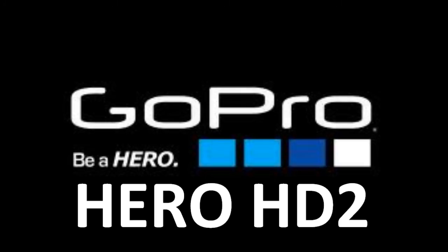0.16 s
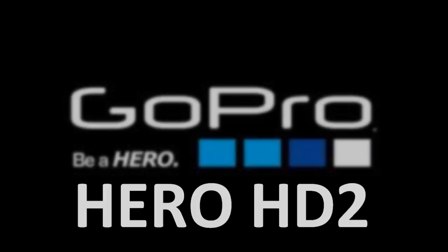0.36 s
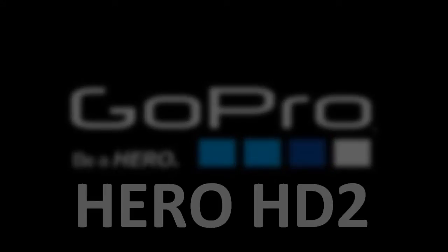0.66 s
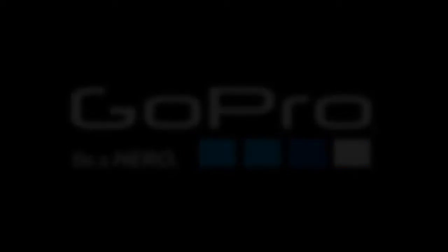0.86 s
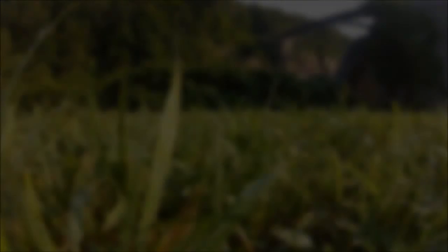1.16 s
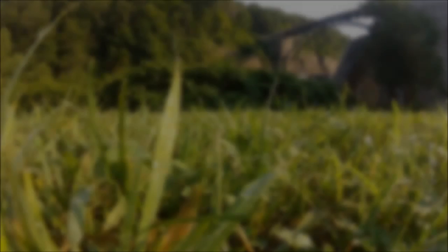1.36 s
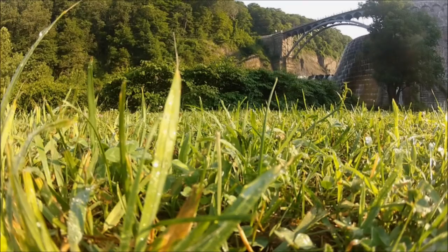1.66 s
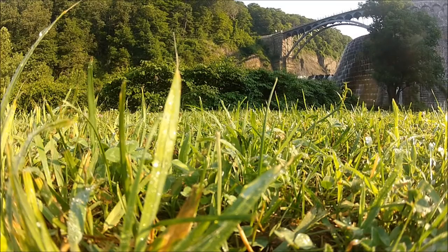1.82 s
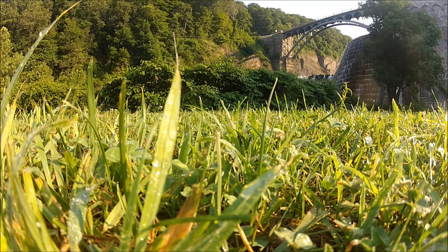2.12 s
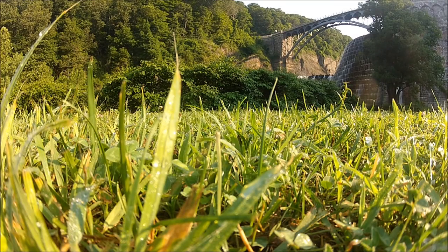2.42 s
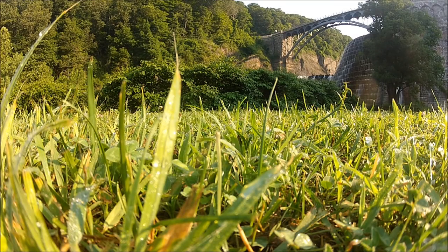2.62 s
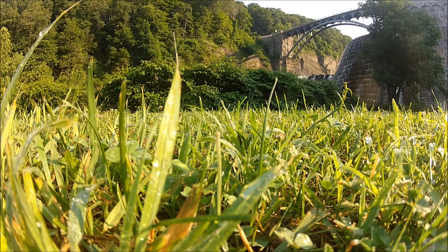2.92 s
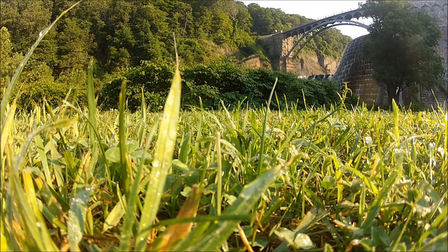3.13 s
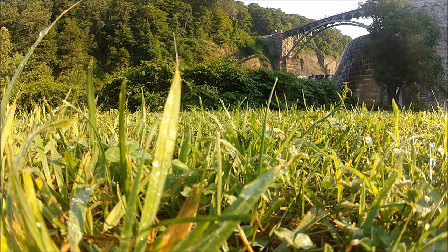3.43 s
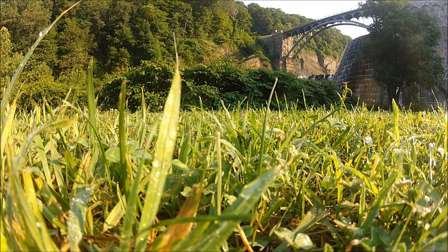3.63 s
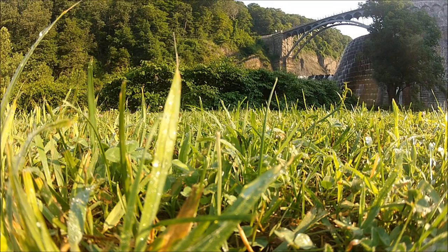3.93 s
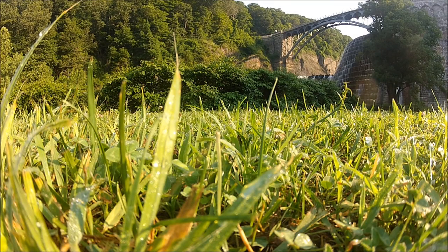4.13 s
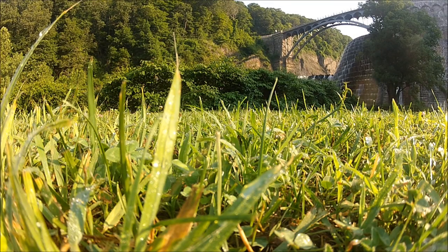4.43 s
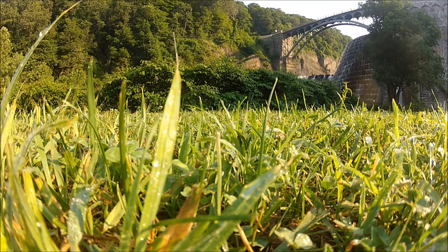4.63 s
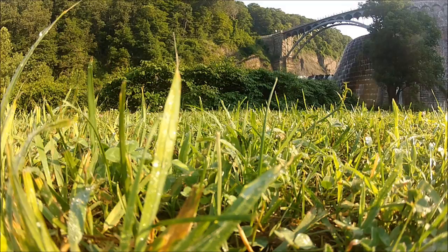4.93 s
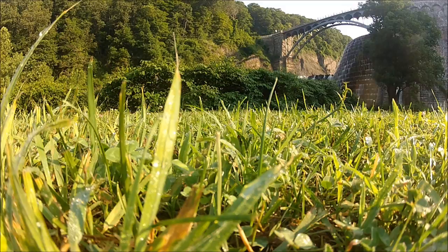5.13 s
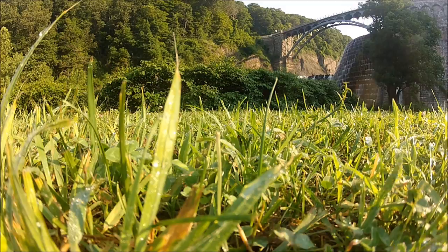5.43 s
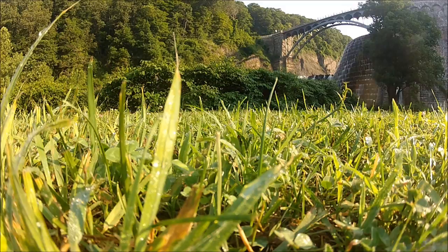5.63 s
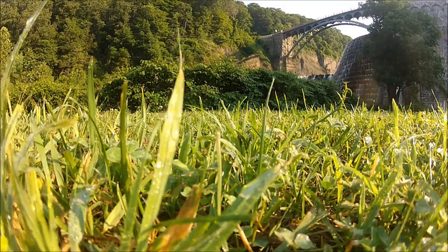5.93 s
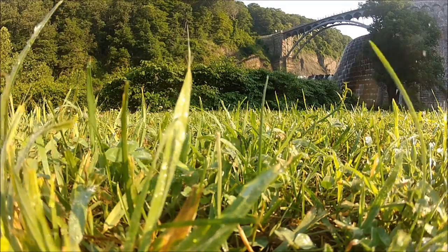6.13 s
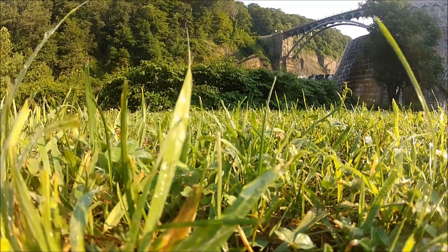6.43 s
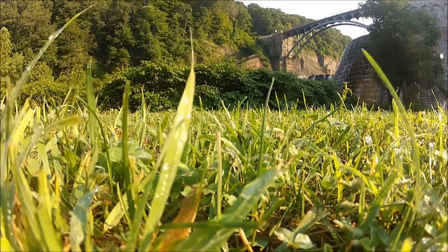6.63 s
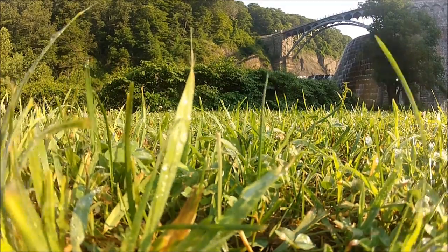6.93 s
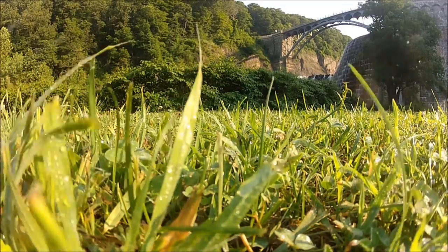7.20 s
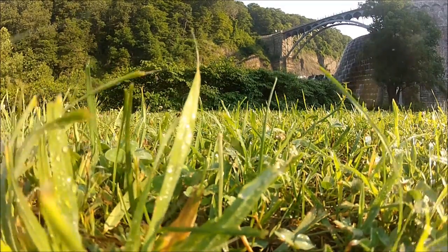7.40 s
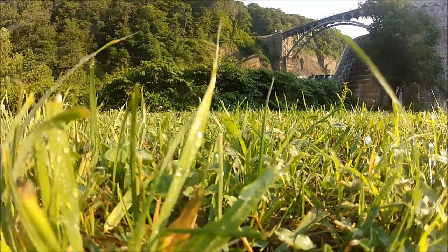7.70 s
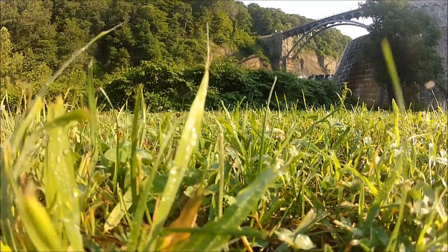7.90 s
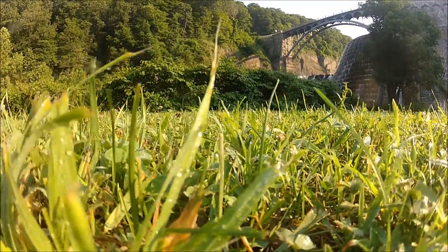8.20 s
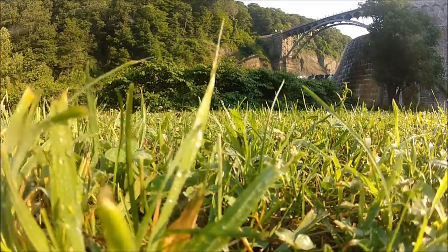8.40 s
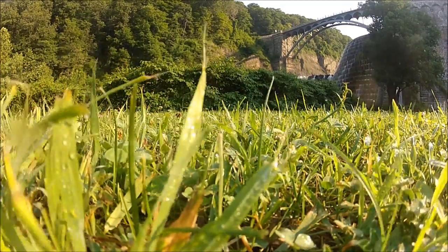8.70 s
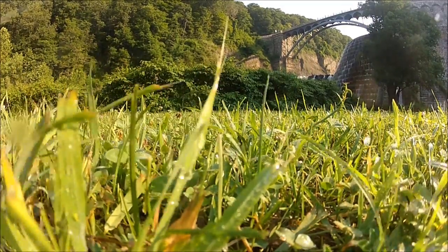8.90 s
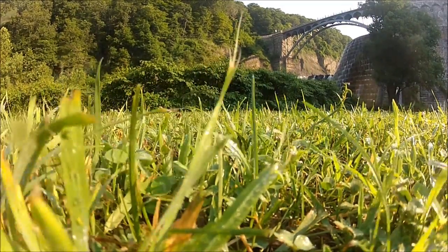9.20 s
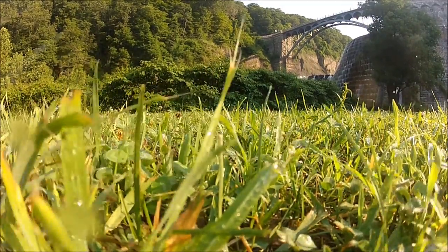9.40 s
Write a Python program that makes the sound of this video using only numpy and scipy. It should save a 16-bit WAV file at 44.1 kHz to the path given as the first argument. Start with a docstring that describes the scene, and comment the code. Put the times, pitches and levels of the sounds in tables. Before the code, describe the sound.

Outdoors, near silence gives way to a soft, low, distant rush that grows for over five seconds. A small quadcopter then gives a short high chirp and a gritty stuttering buzz; its motors whine steeply upward with a resonant growl. It lifts off into a low blade hum with rushing air. The microphone rides on the drone's frame, so everything is close, dry and slightly harsh in the treble.

```python
"""Quadcopter take-off from grass

A small quadcopter is heard from a camera on its own frame over a steady outdoor rush, as the sound fades in
from silence. The speed controllers chirp, the motors stutter into motion and spin up through the frame's
resonances, and it lifts off: blade hum, motor whine and prop wash. One shaft angle drives the tones. The camera
samples at a low rate, mirroring the treble."""
import sys
import numpy as np
from scipy import signal
from scipy.fft import rfft, irfft, next_fast_len
from scipy.io import wavfile
from scipy.ndimage import map_coordinates

SR = 44100
rng = np.random.default_rng(int(sys.argv[2]) if len(sys.argv) > 2 else 0)


def inscribe(sig):
    """Save sig as 16-bit PCM at rate SR to the path in sys.argv[1].

    A 1-D sig is mono; a 2-D sig holds one channel per row.
    Samples are clipped to [-1, 1] before scaling.
    """
    pcm = np.round(np.clip(np.atleast_2d(sig).T, -1, 1) * 32767)
    wavfile.write(sys.argv[1], SR, pcm.astype(np.int16))


N = 421155
T = np.arange(N) / SR  # s

# rotor run-up: (time [s], blade passes [Hz])
BLADE_PASS_CURVE = [(5.7, 51.34), (5.8, 70.43), (5.9, 92.92), (6.0, 105), (6.09, 115.1), (6.2, 121.7),
                    (6.35, 128.7), (6.62, 131.9), (6.71, 138.6), (6.88, 158.5), (7.01, 166.1),
                    (7.42, 172.1), (8.2, 177.6), (8.35, 178), (8.8, 185.5), (9.06, 186.2), (9.22, 188.7),
                    (9.55, 188.5)]
# two-blade rotor tones, relative to the hum: (multiple of shaft rate [-], level [dB])
BLADE_ORDERS = [(1, -21), (2, 1), (3, -19), (4, -5), (5, -26), (6, -15), (7, -23), (8, -19.5), (9, -40),
                (10, -21.5), (11, -35), (12, -24), (13, -52), (15, -43), (16, -21.5), (17, -27)]
# motor tones before the mounts: (multiple of shaft rate, rounded in use [-], level [dB], phase jitter [turns])
MOTOR_ORDERS = [(14, -25.5, .06), (42, -27.5, 0.021), (84.3, -24, .04)]
# motor mount resonances: (centre [Hz], half width [Hz], gain [dB])
MOUNT_RESONANCES = [(777, 116, 0.5), (1336, 28.9, -6.5), (1870, 230, -7), (3850, 142, -4.5), (5230, 600, 0)]
# motors out of step: (time ahead of the main one [s], magnet note before the mounts [dB], whine likewise [dB])
STRAGGLER_MOTORS = [(0.064, -30, -30), (-.12, -28, -25.5)]
# electrical whistles before the mounts:
# (multiple of switching rate [-], multiple of shaft rate [-], ground level [dB], flight level [dB])
WHISTLE_ORDERS = [(1, -84, -28, -70), (0, 126, -26.5, -60), (1, -70, -30.5, -63), (1, -42, -30, -33.5),
                  (0, 56, -25, -50), (0, 52, -30, -48), (1, -52, -39, -36), (-1, 168, -30, -33),
                  (0, 63, -38, -35), (2, -126, -38, -39), (-1, 147, -36, -38)]
# shaking by rotor imbalance and magnets, before the arms: (multiple of shaft rate [-], level [dB])
SHAKING_ORDERS = [(5, -2), (7, -8), (8, -3.5), (9, -20), (10, -7.5), (11, -6), (12, 1), (13, 1), (15, -4),
                  (16, -6), (17, -10), (18, -10)]
# arm bending modes: (centre [Hz], width [Hz], gain [dB])
ARM_MODES = [(292, 41, -3), (622, 59, 1), (750, 220, -10.5), (1400, 170, -20)]
# frame resonances: (centre [Hz], width [Hz], gain [dB])
FRAME_MODES = [(294, 47, 5.5), (658, 47, 8), (1357, 84, 4), (1950, 350, -8), (3895, 180, 2.5),
               (5520, 480, 3.5)]
# prop wash spectrum shape: (frequency [Hz], level [dB])
WASH_SPECTRUM = [(20, -22), (45, -7), (90, -1.5), (270, 1), (420, -1.5), (600, -1.5), (800, -6), (1150, -9),
                 (1700, -13), (3000, -17.5)]
# blade hiss spectrum shape: (frequency [Hz], level [dB])
HISS_SPECTRUM = [(600, -22), (1200, -3), (1420, 8), (1650, -0.5), (2000, -0.5), (2900, 4), (3300, -1),
                 (3800, 1), (4400, -6.5), (5400, -6), (6000, -4)]
# turbulence surges: (time [s], spread [s], rise [dB])
GUST_SURGES = [(7.169, 0.072, 0), (8.41, .08, 2), (9.4, .18, 1)]
# outdoor rush spectrum shape: (frequency [Hz], level [dB])
RUSH_SPECTRUM = [(15, -57), (25, -18), (106, -1.5), (416, -1), (1060, -7), (1250, -10.5), (1530, -19.5),
                 (1970, -26), (2900, -20), (3650, -24.5), (4910, -20), (5260, -23), (5900, -23.5),
                 (7670, -62), (13000, -120)]

LIFT_START_S, LIFT_END_S = 6.68, 7.12  # legs unload, then leave the grass
HUM_DB, HUM_FULL_HZ, HUM_DB_PER_OCTAVE = -17, 137.3, 19  # hum grows with blade-pass rate up to HUM_FULL_HZ
THIRD_DB = -14.5  # extra third blade harmonic near the ground, relative to the hum
SHELL_HZ, SHELL_WIDTH_HZ, SHELL_DB = 582, 23.4, 0  # body resonance, added to the direct sound
SWITCH_HZ = 8075  # power switching rate
WASH_DB, HISS_DB = -22, -26  # air noise away from the ground, before gusts
GROUND_WASH_DB, GROUND_HISS_DB = 1.5, 3.8  # extra air noise close to the ground
FADE_START_S, FADE_END_S, RUSH_DB = 0.25, 5.66, -31.5  # rush level at the end of its fade-in
CLIP_LEVEL, TOP_HZ = 0.88, 15300  # peak limit, upper band edge


def amp(db):
    """Decibels to gain."""
    return 10 ** (np.asarray(db) / 20)


def unit(x):
    """x at rms 1."""
    return x / np.sqrt(np.mean(x ** 2) + 1e-20)


def curves(rows):
    """One value per sample for each column after the time."""
    time_s, *columns = np.transpose(rows)
    return [np.interp(T, time_s, column) for column in columns]


def ramp(start_s, end_s):
    """0 before start, 1 after end, linear between."""
    return np.clip((T - start_s) / max(end_s - start_s, 1e-3), 0, 1)


def wobble(rate_hz):
    """Smooth random curve, rate_hz knots a second."""
    knots = rng.standard_normal(4096)
    return map_coordinates(knots, [T * rate_hz], order=3, mode="wrap")


def filtered(x, response):
    """x times a response of frequency."""
    size = next_fast_len(N + SR // 2)
    spectrum = rfft(x, size) * response(np.fft.rfftfreq(size, 1 / SR))
    return irfft(spectrum, size)[:N]


def coloured(x, points):
    """x through a spectrum of (frequency [Hz], level [dB]) points on a log axis."""
    point_hz, db = np.transpose(points)
    return filtered(x, lambda hz: amp(np.interp(np.log(hz + 1), np.log(point_hz), db)))


def noise(points):
    """Noise of rms 1 with the given spectrum."""
    return unit(coloured(rng.standard_normal(N), points))


def tone(turns):
    """Cosine of rms 1."""
    return np.sqrt(2) * np.cos(2 * np.pi * turns)


def ringing(x, modes):
    """x through parallel resonances (centre [Hz], width [Hz], gain [dB]) of alternating sign."""
    def response(hz):
        total = 0
        for k, (centre, width, db) in enumerate(modes):
            damping = 1j * hz * width
            total = total + (-1) ** k * amp(db) * damping / (centre ** 2 - hz ** 2 + damping)
        return total
    return filtered(x, response)


def envelope(db, full_s, release_s, rise_db_per_s, fall_db_per_s):
    """Gain that rises to a level, holds it and dies away."""
    rise_db = rise_db_per_s * np.maximum(full_s - T, 0)
    fall_db = fall_db_per_s * np.maximum(T - release_s, 0)
    return amp(db - rise_db - fall_db)


def airborne():
    """0 on the ground, 1 in flight."""
    return ramp(LIFT_START_S, LIFT_END_S)


def stutter():
    """The motors catch in surges, twenty a second, as they start."""
    depth = 0.6 * ramp(5.55, 5.68) * (1 - ramp(5.95, 6.2))
    return 1 + depth * tone(20 * T - 0.4)


def sing(turns):
    """Gain of a gliding tone: it swells each time it crosses a resonance of the motor mounts."""
    hz = np.gradient(turns) * SR
    return sum(amp(db) / (1 + ((hz - centre) / half_width) ** 2)
               for centre, half_width, db in MOUNT_RESONANCES)


def blades(shaft):
    """Each blade pushes a pressure pulse past the microphone, harder with speed; uneven air flutters weak orders."""
    pass_hz = 2 * np.gradient(shaft) * SR
    hum_db = HUM_DB + HUM_DB_PER_OCTAVE * np.minimum(np.log2(pass_hz / HUM_FULL_HZ), 0)
    near_ground = ramp(6.0, 6.5) * (1 - airborne())
    hum = amp(THIRD_DB) * near_ground * tone(6 * shaft)
    for order, db in BLADE_ORDERS:
        flutter = 0.06 if db > -10 else 0.25
        turns = round(order) * shaft + flutter / 10 * wobble(14)
        hum += amp(db) * tone(turns) * (1 + flutter * wobble(25))

    def shell(hz):
        return 1 + amp(SHELL_DB) / (1 + ((hz - SHELL_HZ) / SHELL_WIDTH_HZ) ** 2)
    return filtered(amp(hum_db) * hum * ramp(5.7, 5.85), shell)


def motors(shaft):
    """14 magnets pull on the stator, and the windings are switched 42 times a turn."""
    out = np.zeros(N)
    for order, db, jitter_turns in MOTOR_ORDERS:
        turns = round(order) * shaft
        level = amp(db + 1.23 * wobble(25)) * sing(turns)
        out += level * tone(turns + jitter_turns * wobble(35))
    return out * ramp(5.68, 5.78)


def stragglers(shaft):
    """Other motors run up a little early or late, each with its own rising note and whine, then fade out."""
    out = np.zeros(N)
    for ahead_s, magnet_db, whine_db in STRAGGLER_MOTORS:
        own_shaft = np.cumsum(np.interp(T + ahead_s, T, np.gradient(shaft)))
        for order, db in (14, magnet_db), (42, whine_db):
            turns = order * own_shaft
            out += amp(db) * sing(turns) * tone(turns + 0.047 * wobble(40))
    return out * ramp(5.72, 5.83) * (1 - ramp(6.07, 6.57))


def whistles(shaft):
    """Power switching mixes with the motor's orders into gliding whistles; most weaken at lift-off."""
    out, flying = np.zeros(N), airborne()
    for switch, order, ground_db, flight_db in WHISTLE_ORDERS:
        turns = round(switch) * SWITCH_HZ * T + round(order) * shaft
        level_db = ground_db + (flight_db - ground_db) * flying + 2.5 * wobble(30)
        out += amp(level_db) * sing(turns) * tone(turns)
    return out * ramp(5.7, 5.74)


def chirp(start_s=5.302, pitch_hz=4050, db=-35, t60_s=0.32, rough=0.37):
    """The speed controllers energise the windings with a short chirp."""
    age_s = np.maximum(T - start_s, 0)
    decay = amp(db - 60 * age_s / t60_s) * (T > start_s)
    return decay * tone(pitch_hz * T + 0.089 * wobble(150)) * (1 + rough * wobble(300))


def growl(shaft):
    """On the ground, a fan of shaft orders sweeps up through the arms' bending modes."""
    legs = envelope(db=-21.5, full_s=6.0, release_s=6.7, rise_db_per_s=11, fall_db_per_s=32)
    shaking = np.zeros(N)
    for order, db in SHAKING_ORDERS:
        turns = round(order) * shaft + rng.random() + 0.047 * wobble(20)
        shaking += amp(db + 2.5 * wobble(18)) * tone(turns)
    return ringing(shaking * legs * ramp(5.64, 5.72), ARM_MODES)


def arm(shaft, start_s=5.8, attack_s=0.015, stop_s=6.07, pitch_hz=596, rise_hz_per_s=230, db=-16.5,
        fall_db_per_s=24):
    """One arm is driven into resonance; the quickening motor pulls its pitch up until it lets go."""
    age_s = np.clip(T - start_s, 0, 1)
    turns = np.cumsum(pitch_hz + rise_hz_per_s * age_s) / SR
    gate = ramp(start_s, start_s + attack_s) * (1 - ramp(stop_s, stop_s + 0.034))
    level = amp(db - fall_db_per_s * age_s + wobble(40)) * gate
    return level * tone(turns + 0.05 * wobble(40)) * (1 + 0.23 * tone(shaft))


def rattle(shaft, step_hz=170):
    """Starting motors jerk in steps and shake the frame; it buzzes once a turn, ever less as it lifts off."""
    shake = envelope(db=-22.0, full_s=5.74, release_s=6.03, rise_db_per_s=32.5, fall_db_per_s=12)
    steps = step_hz * T + 0.39 * wobble(40)
    running = ramp(4.8, 6.9)  # crossfade from steps to turns
    jolts = (1 - running) * np.exp(0.6 * tone(steps) - 0.1) + running * np.exp(0.35 * tone(shaft))
    buzz = unit(ringing(jolts * rng.standard_normal(N), FRAME_MODES))
    return buzz * shake * np.sqrt(stutter()) * ramp(5.34, 5.38)


def airflow(shaft):
    """Turbulent wash and blade hiss swell in shared gusts and peak between the blades' pressure pulses."""
    gust_db = 0.9 * wobble(16)
    for centre_s, spread_s, db in GUST_SURGES:
        gust_db = gust_db + db * np.exp(-0.5 * ((T - centre_s) / spread_s) ** 2)
    chop = unit(1 + 0.2 * tone(2 * shaft - 0.4) + 0.16 * tone(shaft))
    low = 1 - ramp(6.47, 7.51)  # the rotors' air still strikes the ground
    wash_db = WASH_DB + GROUND_WASH_DB * low + gust_db
    wash = noise(WASH_SPECTRUM) * amp(wash_db) * ramp(5.45, 5.95)
    hiss_db = HISS_DB + GROUND_HISS_DB * low * ramp(6.0, 6.28) + gust_db + 1.46 * wobble(130)
    hiss = noise(HISS_SPECTRUM) * amp(hiss_db) * ramp(5.39, 5.95) * stutter()
    return chop * (wash + hiss)


def outdoors():
    """Steady distant rush; the sound fades in from silence over the opening seconds, and the rush sinks to half
    as the drone grows loud."""
    fade = ramp(FADE_START_S, FADE_END_S) * (1 - 0.5 * ramp(5.83, 6.9))
    return amp(RUSH_DB) * noise(RUSH_SPECTRUM) * fade


def scene():
    """Sum of the drone's sounds, sharing one shaft angle, and the outdoor rush."""
    pass_hz, = curves(BLADE_PASS_CURVE)
    shaft = np.cumsum(pass_hz / 2) / SR  # turns; two blades
    electric = motors(shaft) + stragglers(shaft) + whistles(shaft) + chirp()
    frame = growl(shaft) + arm(shaft) + rattle(shaft)
    return (blades(shaft) + electric + frame + airflow(shaft) + outdoors())[None]


def record(dry):
    """The camera rounds off peaks, samples at 12 kHz and holds each value: images around 6 and 12 kHz."""
    band = coloured(dry[0], [(2000, 0), (5000, 0.5), (5500, -1.5), (5780, -8.5), (6000, -22)])
    band = band / (1 + (band / CLIP_LEVEL) ** 8) ** (1 / 8)
    padded = np.pad(band, (0, SR))
    samples = signal.resample(padded, len(padded) * 12000 // SR)
    held = signal.resample(np.repeat(samples, 4), len(padded))[:N]  # each value held for 4 steps at 48 kHz
    return filtered(held, lambda hz: np.clip((TOP_HZ + 100 - hz) / 150, 0, 1))[None]


dry = scene()
out = record(dry)
inscribe(out)
```